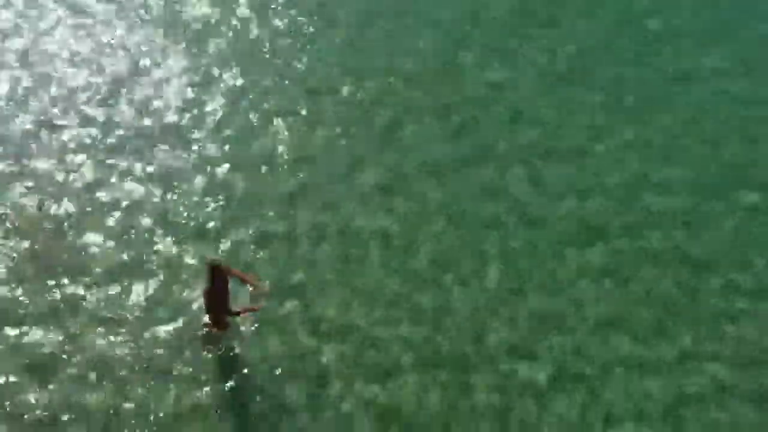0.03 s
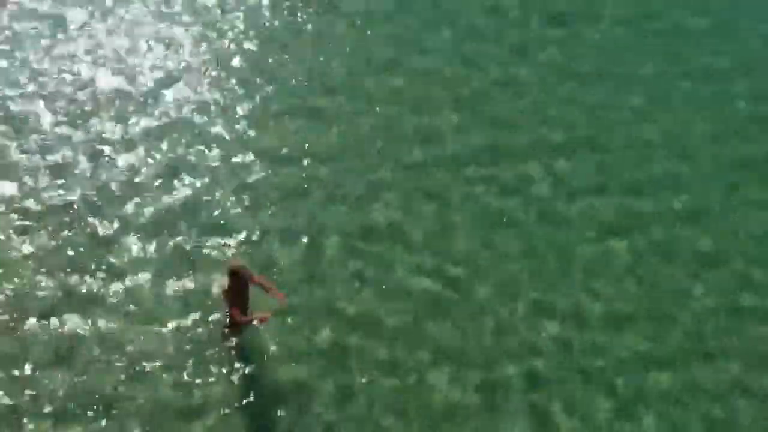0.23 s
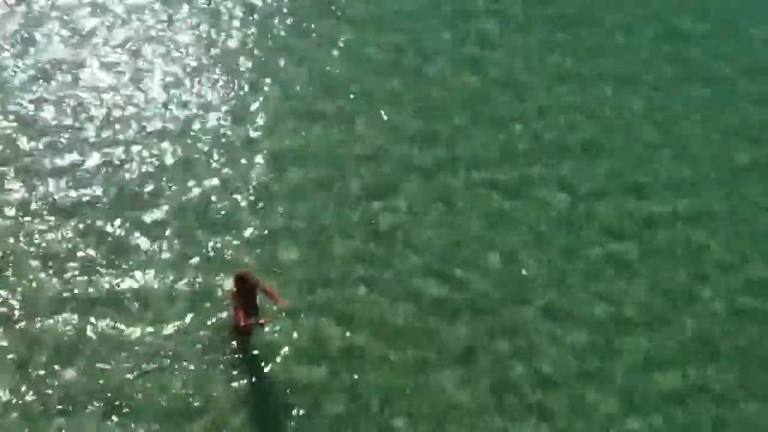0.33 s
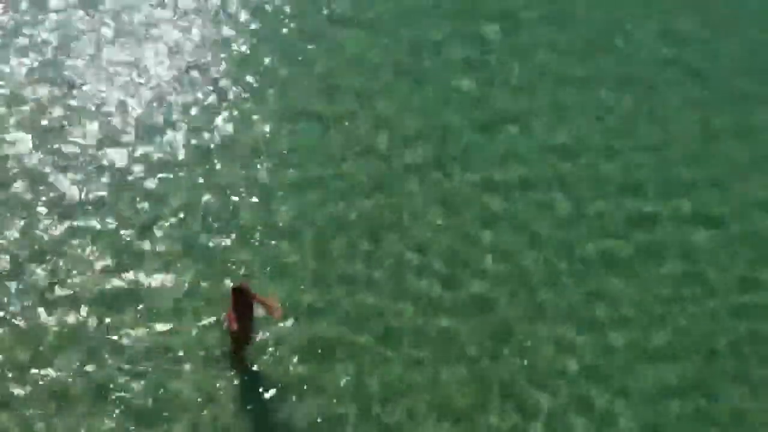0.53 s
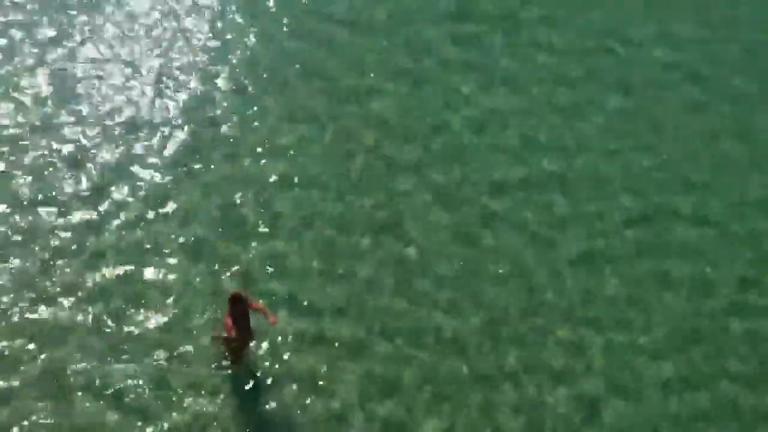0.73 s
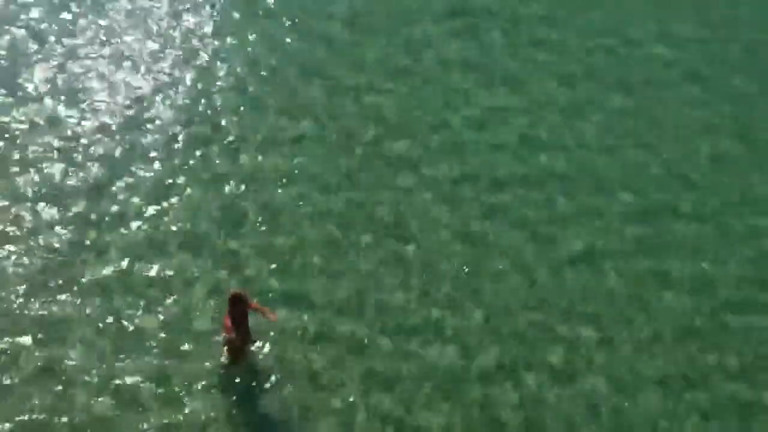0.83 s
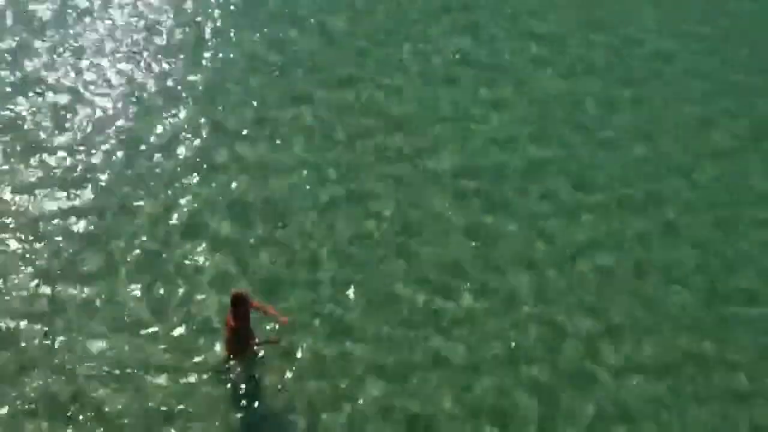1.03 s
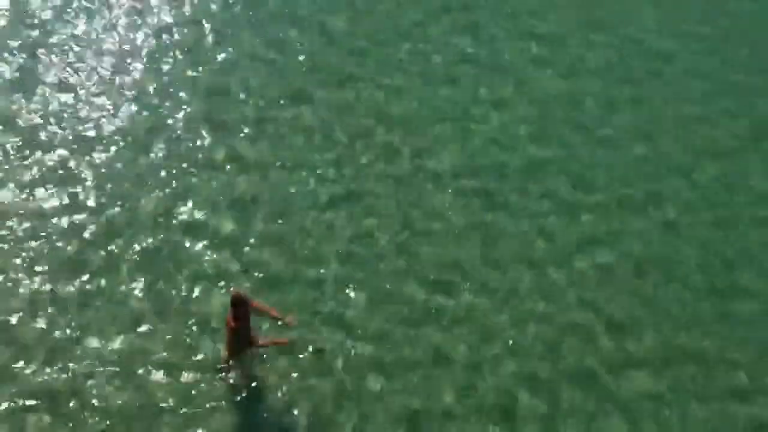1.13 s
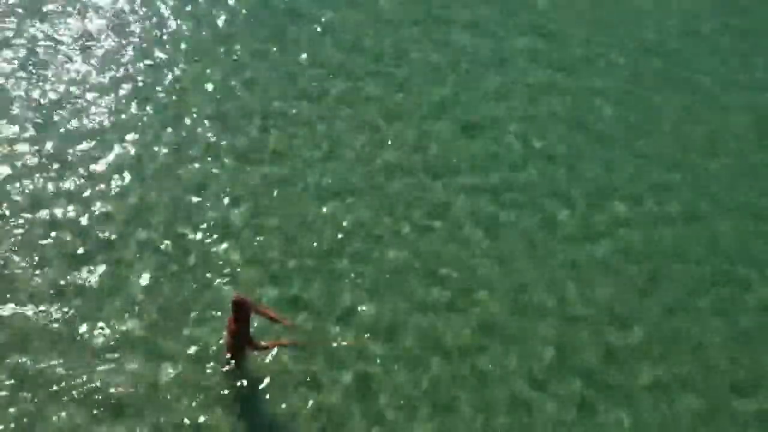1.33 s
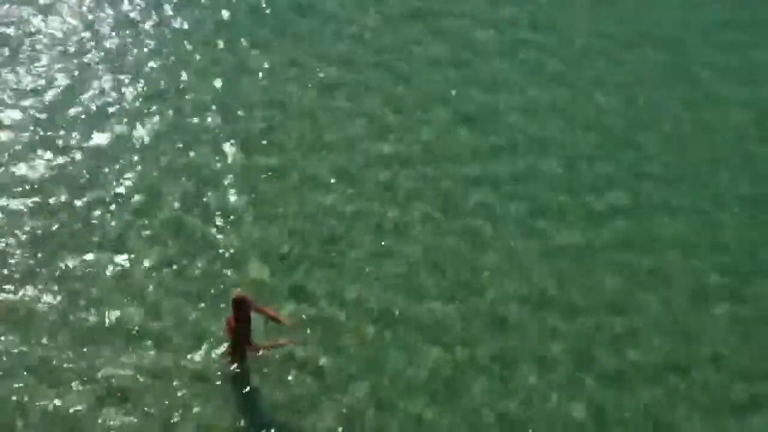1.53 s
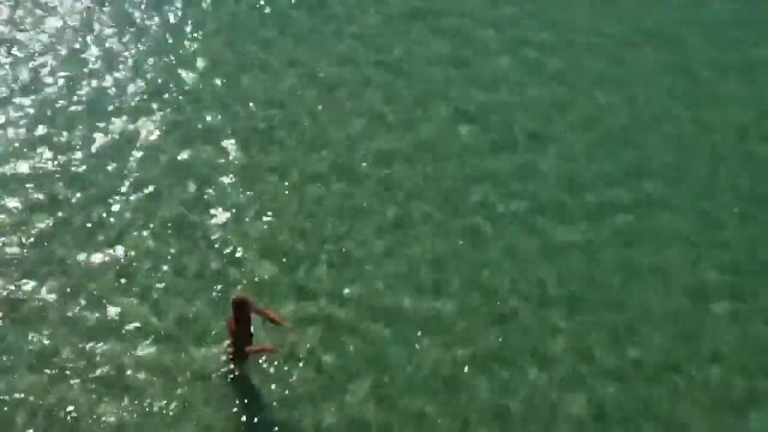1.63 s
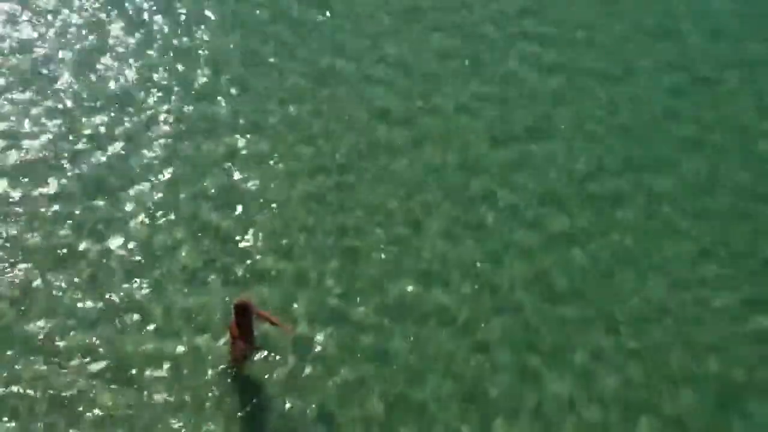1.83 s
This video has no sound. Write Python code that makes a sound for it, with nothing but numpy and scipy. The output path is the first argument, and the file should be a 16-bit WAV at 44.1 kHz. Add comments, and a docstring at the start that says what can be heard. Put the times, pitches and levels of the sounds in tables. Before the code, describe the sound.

Wind buffets the microphone with a low rumble and dull thumps, building from about 0.2 seconds, strongest around 0.5 and dying down by 0.7. Only small, soft puffs follow. Behind it, shallow water ripples in a faint, steady wash with tiny bubbles and a light hiss. At about 1.85 seconds a wavelet makes one small splash with a few quick drips.

```python
"""A gust of wind buffets the microphone, out over shallow, rippling water, then drops to small puffs.
Right on the diaphragm, the wind is a low rumble that brightens with its pressure, and sharp eddies
thump inside the gust. Farther off, the ripples make a steady wash with tiny ringing bubbles and
faint swells of hiss. Near the end a wavelet breaks in one small splash and three drops tick."""
import sys
import numpy as np
from scipy import signal
from scipy.fft import rfft, irfft
from scipy.io import wavfile
from scipy.ndimage import uniform_filter1d

SR = 44100
rng = np.random.default_rng(int(sys.argv[2]) if len(sys.argv) > 2 else 0)


def dump(signal):
    """Clip the signal to [-1, 1] and save it as 16-bit WAV at the path in sys.argv[1]."""
    limited = np.clip(np.atleast_2d(signal).T, -1, 1)
    pcm = np.round(limited * 32767).astype(np.int16)
    wavfile.write(sys.argv[1], SR, pcm)


N = 83790
TIME = np.arange(N) / SR

# wind pressure on the microphone through the gust (time [s], level [dB])
GUST_PRESSURE = [(0, -59.5), (.224, -49.5), (.238, -36.5), (.256, -42.5), (.288, -51), (.318, -48),
                 (.334, -26), (.354, -48.5), (.388, -50), (.401, -28), (.425, -27.5), (.447, -29),
                 (.459, -20), (.47, -36), (.484, -20), (.502, -20.5), (.53, -27), (.548, -38.5),
                 (.577, -43), (.592, -26.5), (.618, -37.5), (.648, -39), (.672, -55.5), (1.9, -54)]
# small puffs around the gust (peak time [s], half length [s], level [dB])
WIND_PUFFS = [(0.084, 0.027, -50), (0.306, 0.0057, -37), (0.921, 0.0052, -41), (0.963, 0.0084, -42.5),
              (1.073, 0.011, -42), (1.122, 0.0078, -41.5), (1.278, 0.018, -53), (1.345, 0.0096, -45),
              (1.395, .012, -45.5), (1.891, 0.0049, -43)]
# low rumble of wind on the microphone (frequency [Hz], relative level [dB])
RUMBLE_SPECTRUM = [(25, -45), (45, -25), (70, -16), (100, -13), (128, 3.5), (165, -0.5), (225, 2),
                   (310, -9.5), (400, -13), (560, -27.5), (1000, -53.5), (2500, -91)]
# brighter flutter under strong pressure (frequency [Hz], relative level [dB])
FLUTTER_SPECTRUM = [(100, -127), (250, -21), (370, 1), (500, -6.5), (700, -8), (900, -28), (1150, -23.5),
                    (1500, -47), (3000, -65)]
# colour of the ripples below the microphone (frequency [Hz], relative level [dB])
WASH_SPECTRUM = [(25, -30), (45, -31), (70, -3), (120, -18.5), (170, 1), (270, -1), (400, -2), (600, -10),
                 (900, -7.5), (1200, -9), (1450, -13), (2000, -12.5), (3000, -20.5), (4200, -25.5),
                 (6300, -29), (8500, -27.5), (11000, -30.5), (15500, -32.5)]
# loudness of the ripples (time [s], level [dB])
WASH_LOUDNESS = [(0, -50), (.3, -50.5), (.62, -50.5), (.8, -52), (1.05, -53.5), (1.3, -52.5), (1.5, -53),
                 (1.7, -51.5), (1.9, -50.5)]
# swells of high hiss (start [s], length [s], level [dB], centre [Hz], half width [Hz])
HISS_SWELLS = [(.035, .06, -80, 8550, 900), (0.178, 0.056, -69, 10400, 700), (0.493, 0.14, -70, 8700, 600),
               (.51, .12, -69, 12900, 740), (0.787, 0.054, -68, 8900, 1000),
               (.805, 0.061, -64, 13700, 1700), (0.88, 0.11, -68.5, 12700, 1400),
               (1.238, 0.15, -63.5, 3553, 2420), (1.247, 0.2, -63, 13600, 2130),
               (1.55, 0.12, -68.5, 13200, 2400)]
# sharp eddies that hit the microphone (time [s], peak level [dB], centre [Hz])
EDDY_HITS = [(.222, -26, 330), (.232, -21.5, 262), (.332, -27, 238), (0.414, -21, 187), (.430, -20, 244),
             (0.437, -23.5, 242), (.454, -16.5, 296), (.462, -18, 248), (0.479, -19, 297),
             (0.483, -18, 203), (.498, -16, 213), (0.515, -19, 247), (.528, -26.5, 257), (.562, -32.5, 237),
             (0.594, -27, 410), (1.883, -33.5, 146)]
# thump of one eddy (frequency [multiple of its centre], relative level [dB])
THUMP_SPECTRUM = [(.1, -49), (.28, -26), (.56, -6.5), (1, 4.5), (1.7, -3), (2.6, -14), (4.2, -30.5),
                  (7, -42.5), (20, -76.5)]
# spatter of the breaking wavelet (frequency [Hz], relative level [dB])
SPLASH_SPECTRUM = [(300, -11), (1200, 1), (2400, 6), (4500, -5.5), (6000, -8), (8000, -0.5), (11000, -22),
                   (15500, -9)]
# drops landing on the water (time [s], peak level [dB])
DROP_HITS = [(1.846, -38), (1.850, -41), (1.859, -46.5)]


def amp(db):
    """Decibels to gain."""
    return 10 ** (np.asarray(db) / 20)


def unit(x):
    """Scales to an rms of one."""
    return x / np.sqrt(np.mean(x ** 2) + 1e-20)


def smooth(x, size):
    """Two passes of a moving average, size samples long."""
    return uniform_filter1d(uniform_filter1d(x, size), size)


def curve(points):
    """A time curve, read at every sample."""
    return np.interp(TIME, *np.transpose(points))


def colour(points, hz):
    """A spectrum in dB, read on a log-frequency axis."""
    f, db = np.transpose(points)
    return np.interp(np.log(hz + 1), np.log(f), db)


def add(mix, s, sound):
    """Mixes a sound in at time s."""
    part = mix[max(round(s * SR), 0):][:len(sound)]
    part += sound[:len(part)]


def noise(points):
    """Steady noise with the given spectrum."""
    gain = amp(colour(points, np.fft.rfftfreq(N, 1 / SR)))
    return unit(irfft(rfft(rng.standard_normal(N)) * gain, N))


def churn(points):
    """Turbulence of even strength: noise divided by its own smoothed envelope."""
    x = noise(points)
    power = smooth(abs(signal.hilbert(x)) ** 2, size=500)
    return unit(x / np.sqrt(power + 1e-6))


def wind(strong_db=-24, flutter_db=-38.5, flutter_db_per_db=2.14):
    """Pressure right on the microphone drives a low rumble and, more steeply, a brighter flutter."""
    pressure = amp(curve(GUST_PRESSURE))
    puffs = sum(amp(db) * np.exp(-.5 * ((TIME - s) / half) ** 2) for s, half, db in WIND_PUFFS)
    rumble = np.hypot(pressure, puffs) * churn(RUMBLE_SPECTRUM)
    flutter_gain = amp(flutter_db) * (pressure / amp(strong_db)) ** flutter_db_per_db
    return rumble + flutter_gain * churn(FLUTTER_SPECTRUM)


def wash(patchy_db=1.12):
    """Countless ripples below the microphone merge into a noise with small drifting patches."""
    spectra = signal.stft(noise(WASH_SPECTRUM), nperseg=512, noverlap=384)[2]
    patches = uniform_filter1d(rng.standard_normal(spectra.shape), size=9, axis=0)  # across frequency
    patches = uniform_filter1d(patches, size=20, axis=1)  # across time
    ripples = signal.istft(spectra * amp(patchy_db * unit(patches)), nperseg=512, noverlap=384)[1][:N]
    return amp(curve(WASH_LOUDNESS)) * unit(ripples)


def bubbles(per_s=700, level_db=-64.5, spread_db=6.0, pitches=24, decay_cycles=6, glide=0.0924):
    """Tiny bubbles in the ripples, each a short rising ring."""
    out, t = np.zeros(N), TIME[:SR // 20]
    for hz in np.geomspace(698, 4010, pitches):
        age = t * hz / decay_cycles
        envelope = np.exp(-age) * (1 - np.exp(-t * hz))
        ring = envelope * np.sin(2 * np.pi * hz * t * (1 + glide * age / 2))
        births = rng.random(N) < per_s / pitches / SR
        strength = amp(spread_db * np.minimum(rng.exponential(1, N), 3))
        out += signal.oaconvolve(births * strength, ring)[:N] / np.sqrt(hz)
    return amp(level_db) * unit(out)


def hisses(rise_s=0.016, fall_s=0.013, sag_hz_per_s=9800, waver_db=1.9):
    """Faint bands of hiss behind the wind swell, waver and fade, sinking in pitch as they go."""
    out, f = np.zeros(N), np.fft.fftfreq(N, 1 / SR)
    for start, length, db, hz, half_width in HISS_SWELLS:
        t = TIME - start
        white = [1, 1j] @ rng.standard_normal((2, N))
        band = np.fft.ifft(np.fft.fft(white) * np.exp(-.5 * (f / half_width) ** 2))
        centre = hz - sag_hz_per_s * (np.clip(t, 0, length) - length / 2)
        hiss = (band * np.exp(2j * np.pi * np.cumsum(centre) / SR)).real  # band shifted up to centre
        envelope = (1 + np.tanh(t / rise_s)) * (1 + np.tanh((length - t) / fall_s)) / 4
        waver = unit(smooth(rng.standard_normal(N), size=700))
        out += amp(db + waver_db * waver) * envelope * unit(hiss)
    return out


def eddies(size=4096):
    """Each eddy is a push or pull on the diaphragm that rings for a cycle or two."""
    out, f = np.zeros(N), abs(np.fft.fftfreq(size, 1 / SR))
    for (s, db, hz), sign in zip(EDDY_HITS, rng.choice([-1, 1], len(EDDY_HITS))):
        spectrum = [(multiple * hz, level) for multiple, level in THUMP_SPECTRUM]
        log_gain = np.log(amp(colour(spectrum, f)))
        response = np.exp(np.conj(signal.hilbert(log_gain)))  # minimum phase, for a sharp onset
        thump = np.fft.ifft(response).real[:size // 2]
        add(out, s, sign * amp(db) * thump / abs(thump).max())
    return out


def splash(start_s=1.842, level_db=-57.5, rise_s=0.004, decay_from_s=.022, t60_s=0.048, grain_db=3):
    """A wavelet breaks in the shallows with a short grainy spatter."""
    t = TIME - start_s
    attack = np.clip(t / rise_s, 0, 1)
    decay = amp(-60 * np.maximum(t - decay_from_s, 0) / t60_s)
    grain = amp(grain_db * unit(uniform_filter1d(rng.standard_normal(N), size=80)))
    return amp(level_db) * attack * decay * unit(grain * noise(SPLASH_SPECTRUM))


def drops(t60_s=0.0091):
    """Each drop lands on the water as a brief tick with the colour of the splash."""
    out, t = np.zeros(N), TIME[:SR // 20]
    for s, db in DROP_HITS:
        tick = noise(SPLASH_SPECTRUM)[:len(t)] * amp(-60 * t / t60_s)
        add(out, s, amp(db) * tick / abs(tick).max())
    return out


def scene():
    """One microphone over the shallows: wind right on it, water behind."""
    buffeting = wind() + eddies()
    background = wash() + bubbles() + hisses() + splash() + drops()
    return (buffeting + background)[None]


def record(dry, low_cut_hz=66, band_limit_hz=15750):
    """The microphone's low cut and the recorder's band limit."""
    f = np.fft.rfftfreq(2 * N, 1 / SR)
    low_cut = 1 / np.sqrt(1 + (low_cut_hz / (f + 1)) ** 6)
    mic = irfft(rfft(dry, 2 * N) * low_cut)[:, :N]
    lowpass = signal.firwin(801, band_limit_hz, window=("kaiser", 9), fs=SR)
    return signal.oaconvolve(mic, lowpass[None], "same")


dry = scene()
out = record(dry)
dump(out)
```